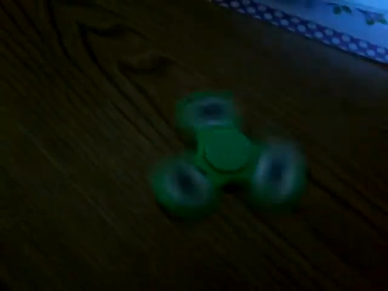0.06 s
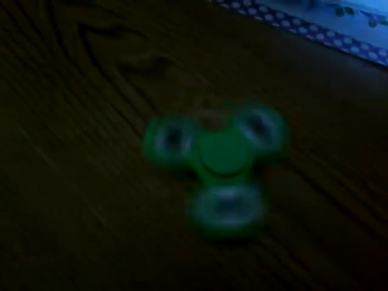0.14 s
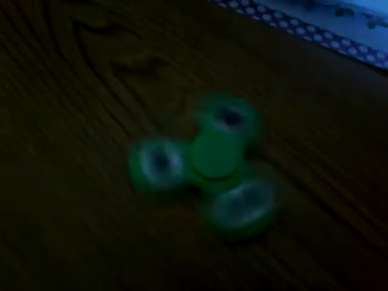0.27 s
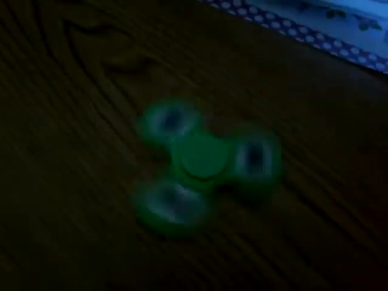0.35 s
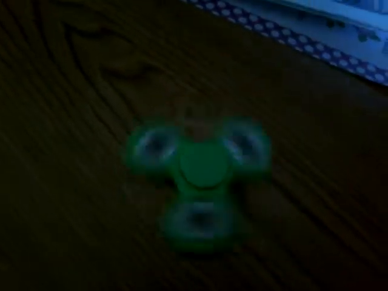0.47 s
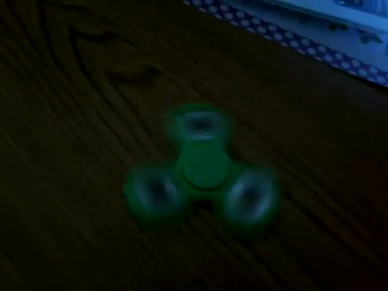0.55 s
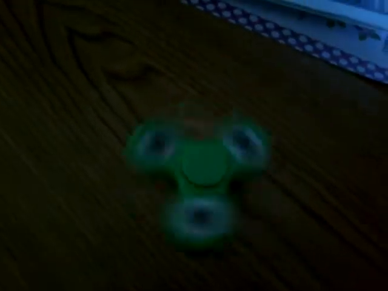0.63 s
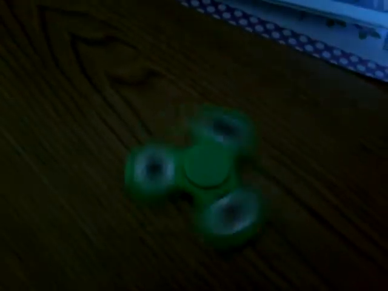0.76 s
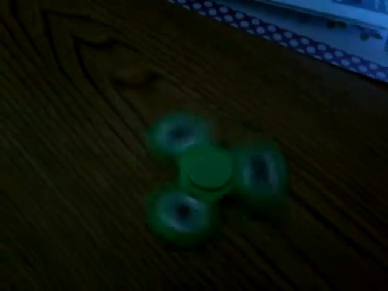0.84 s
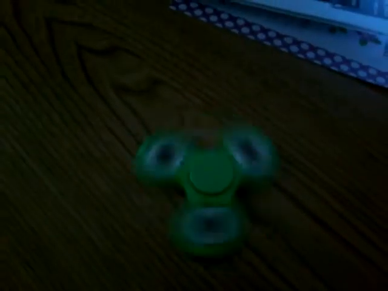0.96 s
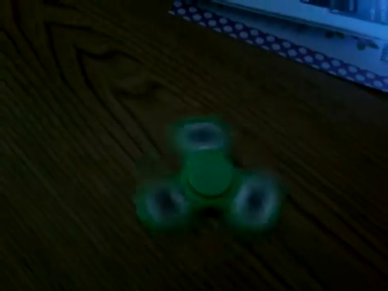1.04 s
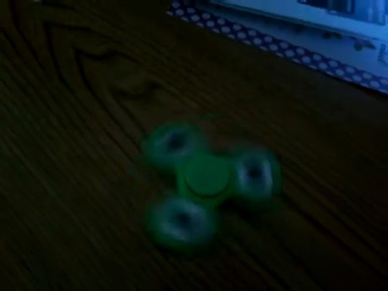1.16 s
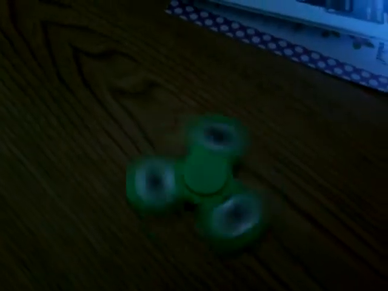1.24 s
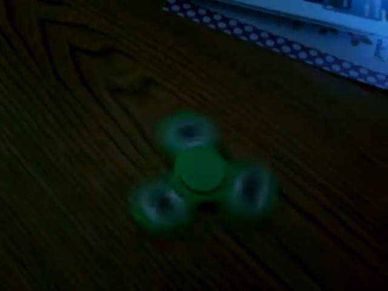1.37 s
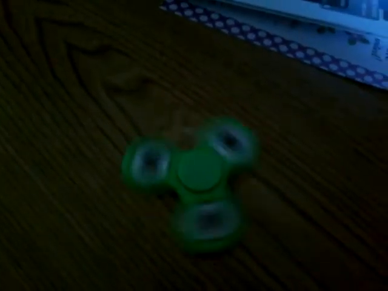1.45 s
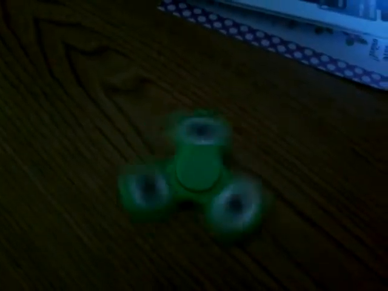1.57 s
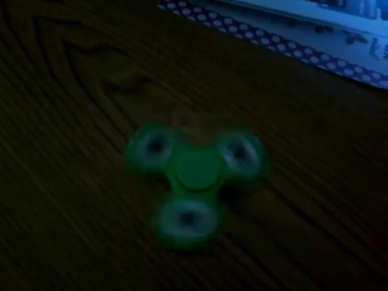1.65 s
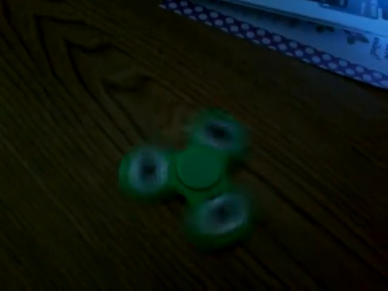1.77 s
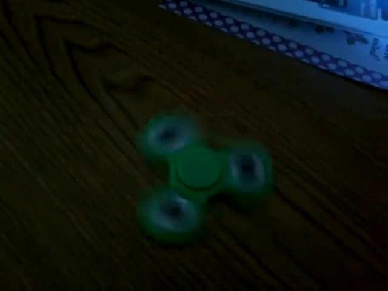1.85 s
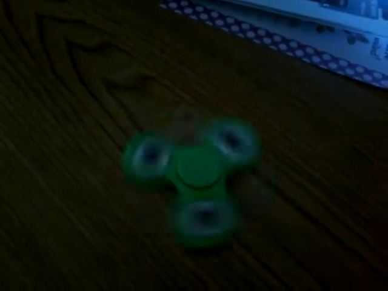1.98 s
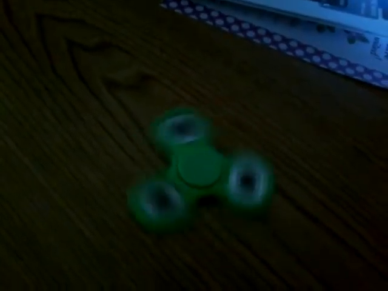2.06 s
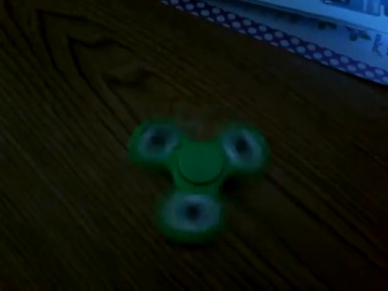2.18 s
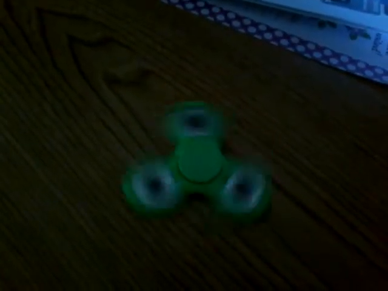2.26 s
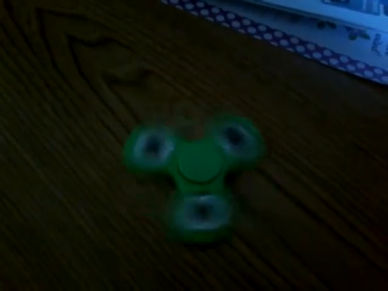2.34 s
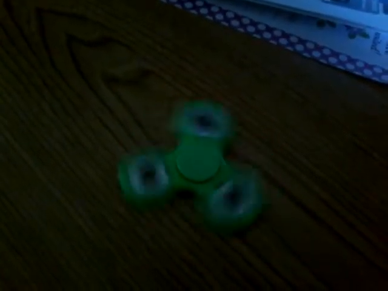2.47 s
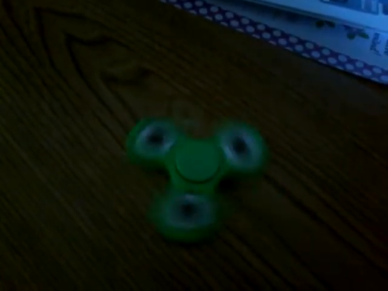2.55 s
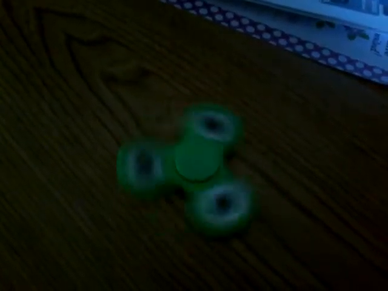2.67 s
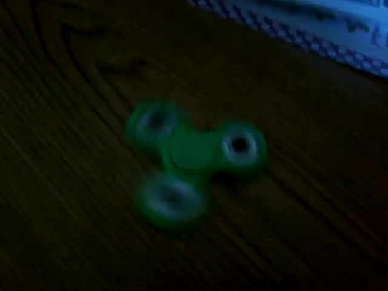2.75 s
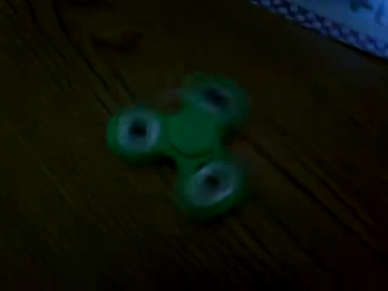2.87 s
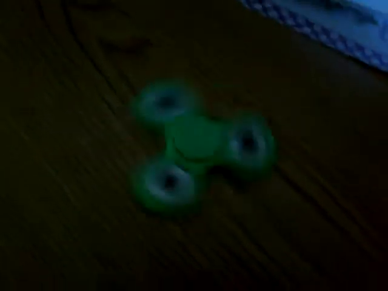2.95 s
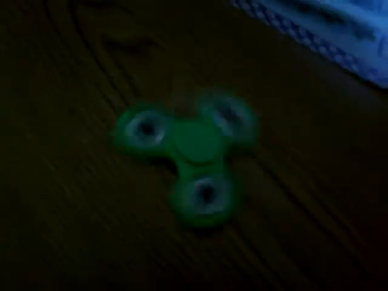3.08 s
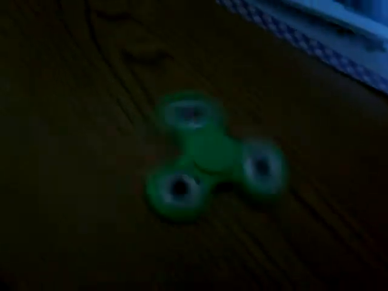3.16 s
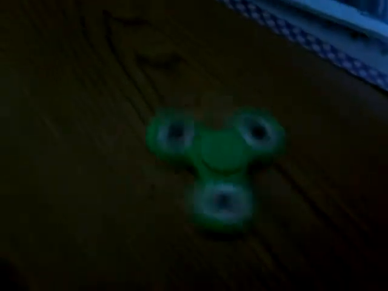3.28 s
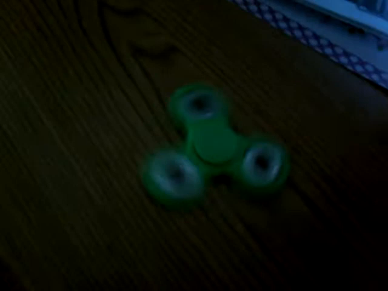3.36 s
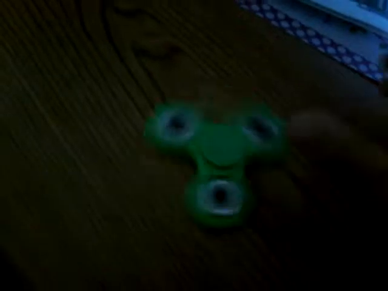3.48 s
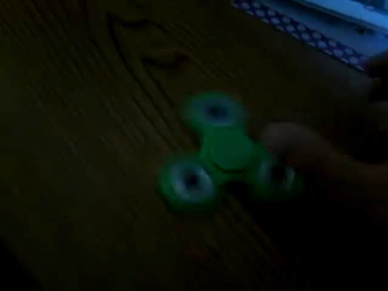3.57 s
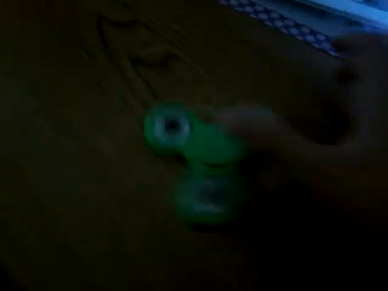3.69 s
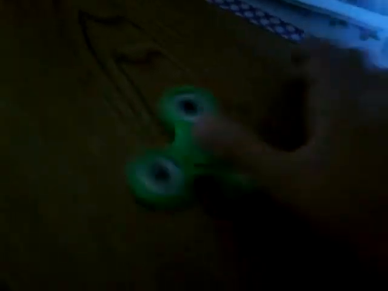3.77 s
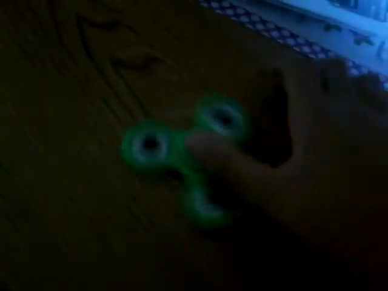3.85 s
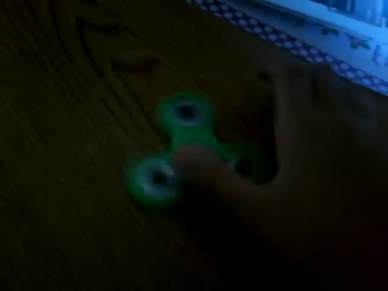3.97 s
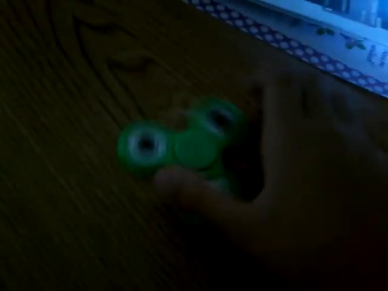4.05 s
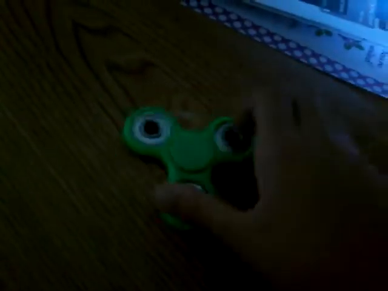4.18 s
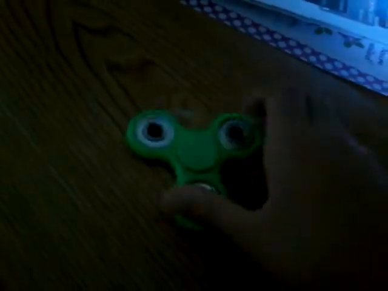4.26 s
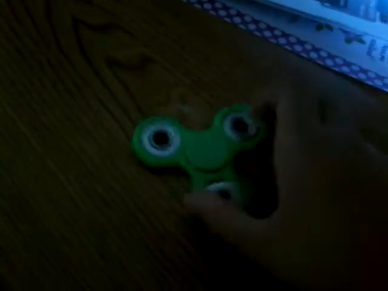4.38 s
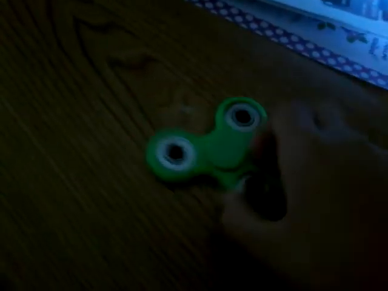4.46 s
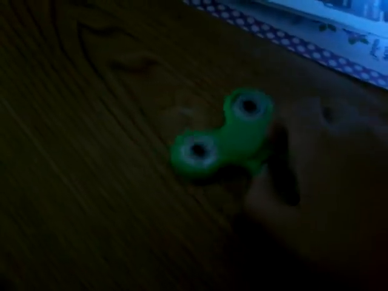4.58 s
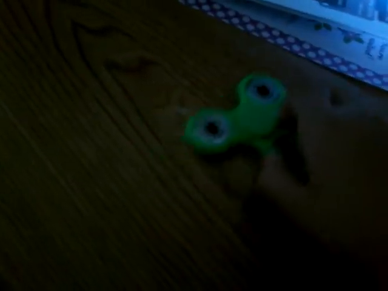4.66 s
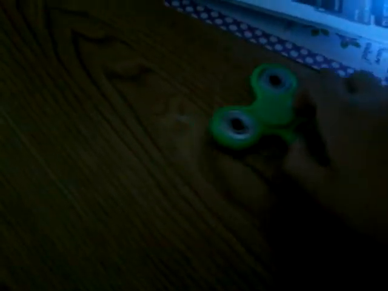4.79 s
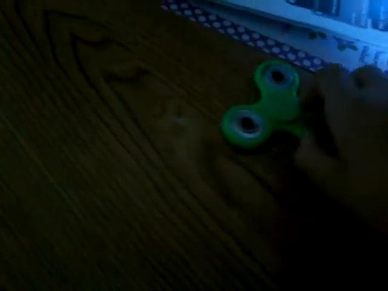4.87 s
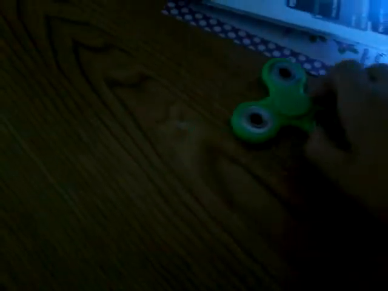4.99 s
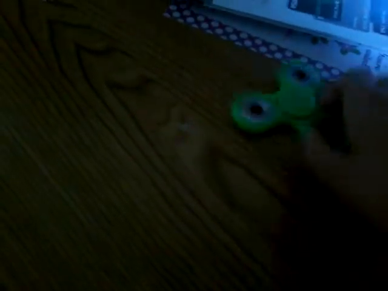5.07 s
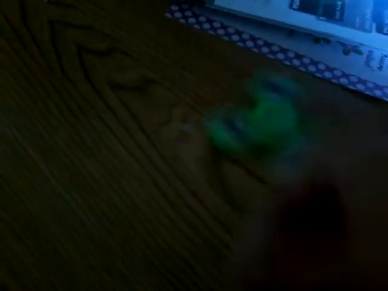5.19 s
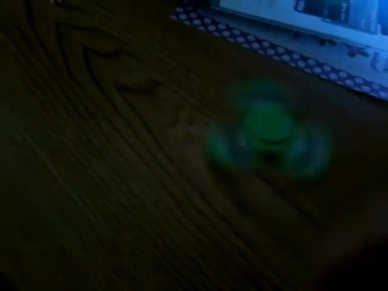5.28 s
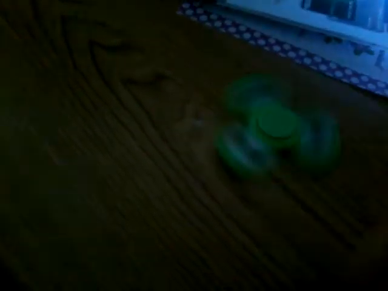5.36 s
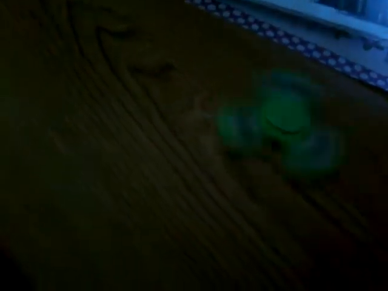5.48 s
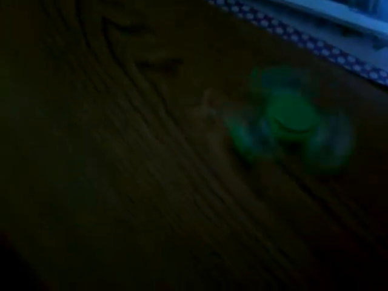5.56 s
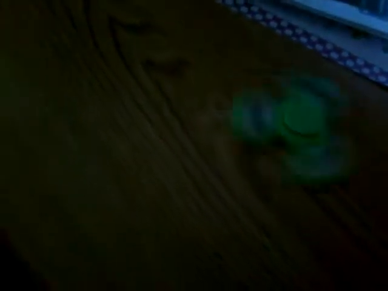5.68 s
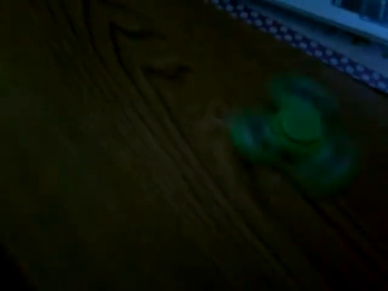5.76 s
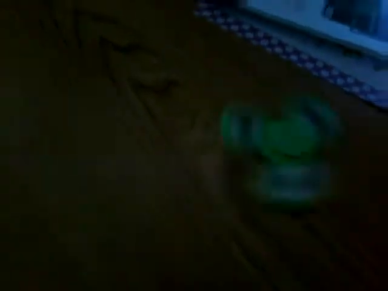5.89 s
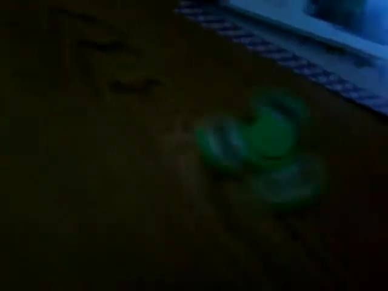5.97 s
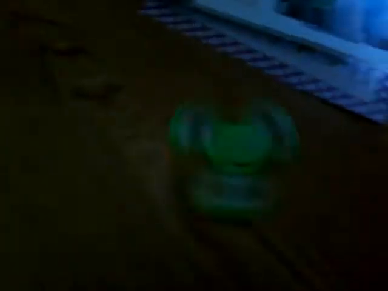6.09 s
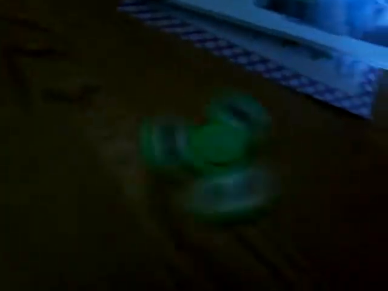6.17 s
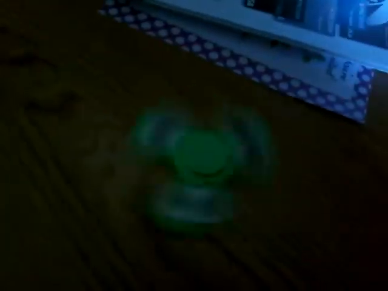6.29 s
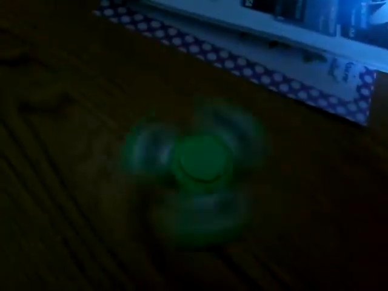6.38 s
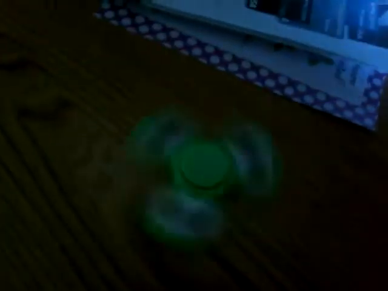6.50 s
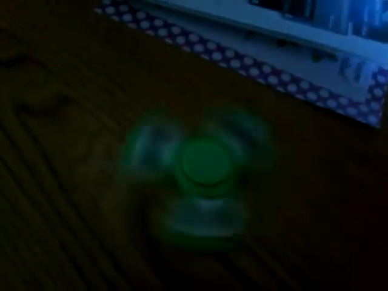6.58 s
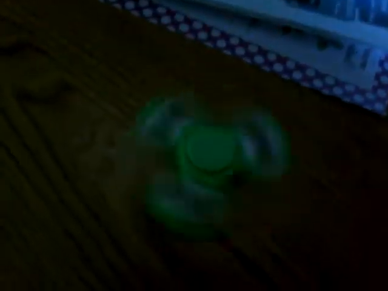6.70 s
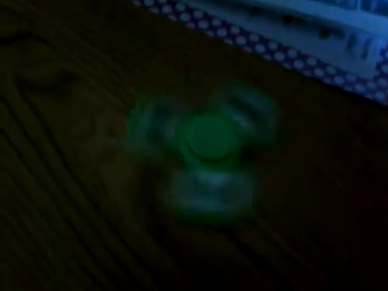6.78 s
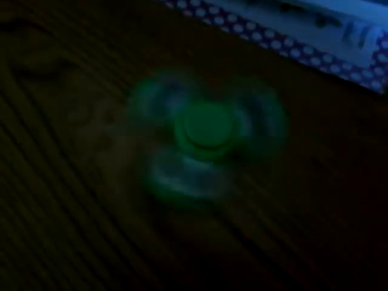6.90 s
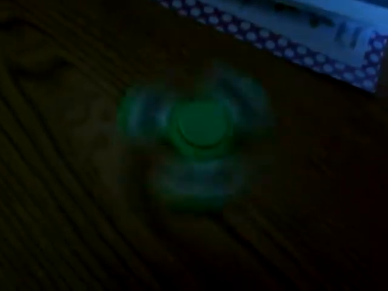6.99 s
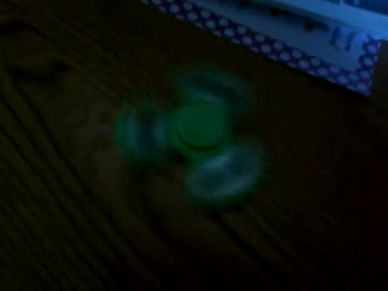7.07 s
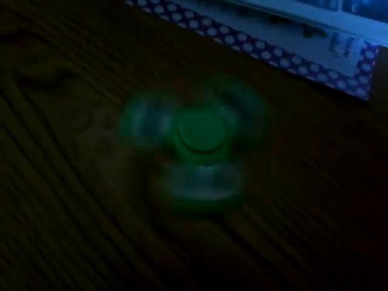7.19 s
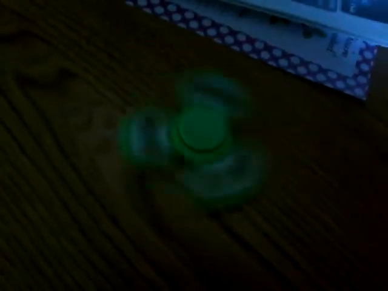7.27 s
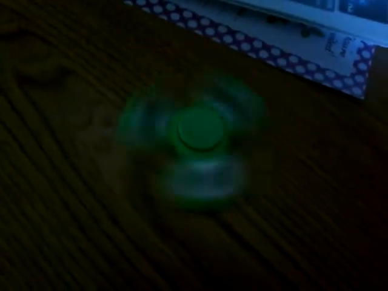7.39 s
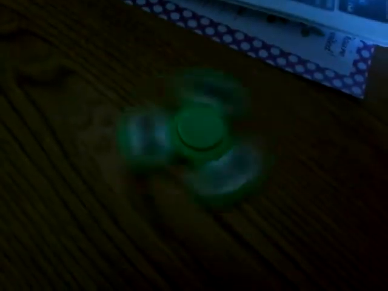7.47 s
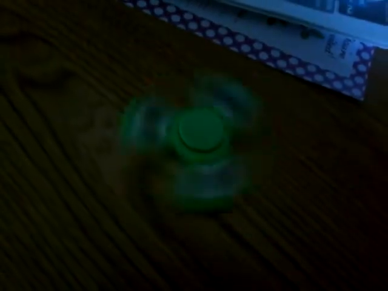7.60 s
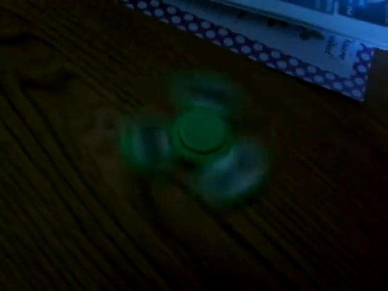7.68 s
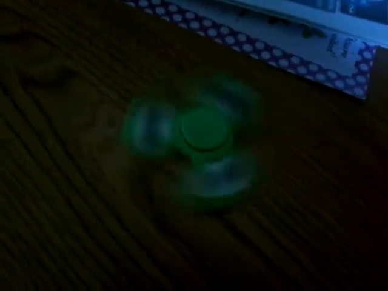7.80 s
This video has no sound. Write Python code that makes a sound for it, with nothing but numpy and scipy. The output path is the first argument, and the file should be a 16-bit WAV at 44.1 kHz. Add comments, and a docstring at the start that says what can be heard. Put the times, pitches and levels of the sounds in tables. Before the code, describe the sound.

Rumbling, ticking whir of a spinner on wood, one sharp snap, a brief scraping stop, then a brisker, rattlier spin over faint clock ticks.

```python
"""A whir slows, stops amid a snap and scrapes, then returns faster, with rattles, thumps and a faint clock.
A plastic fidget spinner on a wooden table is caught by a finger, pulled aside and flicked to a faster spin.
Random ball impacts ring the steel bearing near 7 kHz and rumble through tabletop modes; the loose rotor
rattles at set places in each turn. Skin and clock are coloured grains, the drag a slip train through wood;
a wavering low sine drone, hum and soft noise lie beneath."""
import sys
import numpy as np
from scipy import signal
from scipy.fft import rfft, irfft
from scipy.io import wavfile
from scipy.ndimage import uniform_filter1d, map_coordinates

SR = 44100
rng = np.random.default_rng(int(sys.argv[2]) if len(sys.argv) > 2 else 0)


def to_wav(sig):
    """Store sig (one row per channel, or 1-D mono) as 16-bit WAV at the path in sys.argv[1].

    Samples outside -1..1 are clipped; the rate is SR.
    """
    pcm = np.clip(np.atleast_2d(sig), -1, 1) * 32767
    pcm = np.round(pcm).astype(np.int16)
    wavfile.write(sys.argv[1], SR, pcm.T)  # frames by channels


N = 345699

# plastic rotor modes: f/Hz, width/Hz, relative level at slow spin/dB, at fast spin/dB
ROTOR_MODES = [(568, 150, 0.5, -2), (796, 150, 2.5, 0), (1007, 63, -2, 0), (1191, 116, -0.5, -2),
               (1640, 244, -6, -7), (1905, 144, -8, -1.5), (2140, 160, -5.5, -7.5), (2256, 140, -9, -8),
               (2490, 175, -2.5, -6), (3130, 1400, -10, -17)]
# steel bearing modes: f/Hz, width/Hz, relative level/dB
RACE_MODES = [(6330, 260, -12.5), (6885, 301, 5.5), (7650, 255, 0), (7900, 210, -2.5), (8670, 810, -10),
              (9140, 360, -7.5), (9870, 1600, -18.5)]


def undb(db):
    """Decibels to gain."""
    return 10 ** (np.asarray(db) / 20)


def unit(x):
    """Scale to rms 1."""
    return x / np.sqrt(np.mean(x ** 2))


def curves(table):
    """Columns of a table, interpolated linearly over time."""
    t_s, *columns = np.transpose(table)
    return [np.interp(np.arange(N) / SR, t_s, column) for column in columns]


def walk(rate_hz):
    """Smoothed random steps, spread near 1."""
    step = int(SR / rate_hz)
    held = np.repeat(rng.standard_normal(N // step + 1), step)
    return unit(uniform_filter1d(held, step)[:N])


def colour(points, size=4096):
    """Minimum-phase impulse response of a (f/Hz, level/dB) spectrum, via the folded cepstrum."""
    hz, db = np.transpose(points)
    f_hz = np.maximum(np.arange(size // 2 + 1) * SR / size, 1)
    gain = undb(np.interp(np.log(f_hz), np.log(hz), db))
    cepstrum = irfft(np.log(gain))
    causal = 2 * cepstrum[:size // 2] * (np.arange(size // 2) > 0)
    return irfft(np.exp(rfft(causal, size)))


def modes(table, size=12000):
    """Impulse response of damped resonances, decay set by width, polarity alternating."""
    t = np.arange(size) / SR
    response = np.zeros(size)
    for k, (hz, width_hz, db) in enumerate(table):
        decay = np.exp(-np.pi * width_hz * t)
        response += (-1) ** k * undb(db) * width_hz * decay * np.sin(2 * np.pi * hz * t)
    return response


def ring(force, response):
    """Drive a body with a force: convolution, cut to the force's length."""
    return signal.fftconvolve(force, response)[:len(force)]


def band(x, low_hz, high_hz):
    """Band-pass with moderately steep skirts."""
    return signal.sosfilt(signal.butter(2, [low_hz, high_hz], "bandpass", fs=SR, output="sos"), x)


def wander(x, depth, rate_hz):
    """Drift the pitch of a whole sound slightly by varying its read speed."""
    speed = 1 + depth * walk(rate_hz)
    return map_coordinates(x, [np.cumsum(speed / speed.mean())], order=3, mode="mirror")


def grains(rate_per_s, spread_db):
    """Tiny impacts of random time and sign; spread_db scales their exponential scatter in level."""
    hit = rng.random(N) < rate_per_s / SR
    scatter = np.minimum(rng.exponential(size=N), 3)
    return hit * rng.choice([-1, 1], N) * undb(spread_db * scatter)


def add(out, t_s, sound):
    """Mix a sound in at t_s, trimmed to the scene."""
    i = int(t_s * SR)
    part = sound[max(-i, 0):max(N - i, 0)]
    out[max(i, 0):max(i, 0) + len(part)] += part


def swells(table):
    """Half-sine level arches from rows of t/s, length/s, level/dB."""
    out = np.zeros(N)
    for t_s, length_s, db in table:
        add(out, t_s, undb(db) * np.sin(np.linspace(0, np.pi, int(length_s * SR))))
    return out


def chatter(decay_s, tail_db, tail_s, first=0, size=6000):
    """Force of one contact: optional first blow, quickly dying noise and a fainter, longer tail."""
    t = np.arange(size) / SR
    envelope = np.exp(-t / decay_s) + undb(tail_db) * np.exp(-t / tail_s)
    return first * (t == 0) + rng.standard_normal(size) * envelope


def blows(table, force, response):
    """Each t/s, peak/dB row drives a body with a fresh force."""
    out = np.zeros(N)
    for t_s, db in table:
        sound = ring(force(), response)
        add(out, t_s, sound * undb(db) / np.abs(sound).max())
    return out


def merged(hard, ordinary):
    """Hard blows, plus the ordinary ones that fall clear of them."""
    settle_s = .012
    clear = [(t_s, db) for t_s, db in ordinary
             if min(abs(t_s - row[0]) for row in hard) > settle_s]
    return list(hard) + clear


def room():
    """Steady electrical hum of sine partials over softly coloured noise."""
    # hum: f/Hz, rms/dB
    hum_lines = [(120, -81.5), (240, -64.5), (360, -73.5)]
    # hush colour: f/Hz, relative level/dB
    hush_points = [(20, -1.5), (60, -16), (100, 6), (170, -3), (240, -4.5), (500, -10), (1200, -16.5),
                   (3000, -20), (8000, -18.5), (15500, -23.5)]
    hush_rms_db = -65
    t = np.arange(N) / SR
    hum = sum(undb(db) * unit(np.sin(2 * np.pi * (hz * t + rng.random()))) for hz, db in hum_lines)
    hush = unit(ring(rng.standard_normal(N), colour(hush_points)))
    return hum + undb(hush_rms_db) * hush


def clock(step_s=0.037, room_s=0.047, size=16000):
    """Each second the gears shuffle briefly as coloured grains; an exponential fade stands for room smear."""
    # tick and tock in turn: rise/s, level/dB
    steps = [(.005, -53.5), (.03, -56.5)]
    # clock colour: f/Hz, relative level/dB
    gear_points = [(700, -70), (1600, -6), (2100, -7.5), (2250, 5), (2450, -9), (3600, -10.5), (5000, -7),
                   (6900, -1), (7800, -1.5), (9300, -14), (11000, -22)]
    first_tick_s = -0.033
    t = np.arange(size) / SR
    fade = np.exp(-np.maximum(t - step_s, 0) / room_s)
    level = np.zeros(N)
    for second in range(N // SR + 1):
        rise_s, db = steps[second % 2]
        add(level, first_tick_s + second, undb(db) * np.minimum(t / rise_s, 1) * fade)
    return level * unit(ring(grains(5000, spread_db=0.0), colour(gear_points)))


def drone():
    """Low sine of wavering pitch and level, with a slow throb and narrow noise about it."""
    # drone level before waver and throb: t/s, level/dB
    level_points = [(.15, -69), (1.1, -70.5), (4.4, -74.5), (4.8, -62.5), (5.12, -71), (5.3, -63),
                    (5.8, -58), (6.02, -68), (6.24, -54), (7.75, -52)]
    drone_hz, blur_db = 55.8, -75.5
    # the throb is plain while the drone is faint
    throb_db, throb_period_s, throb_crest_s = -78.5, .48, 1.47
    db, = curves(level_points)
    t = np.arange(N) / SR
    phase = 2 * np.pi * np.cumsum(drone_hz * (1 + 0.019 * walk(9))) / SR
    throb = undb(throb_db) * np.cos(2 * np.pi * (t - throb_crest_s) / throb_period_s)
    level = undb(db + 1.6 * walk(10)) + throb
    blur = walk(9) * np.sin(phase) + walk(9) * np.cos(phase)
    return unit(np.sin(phase)) * level + undb(blur_db) * blur


def fingers():
    """Skin catches and slips on plastic: dense uneven grains, sparse scratches, drifting colour."""
    # skin brushes the plastic: t/s, length/s, level/dB
    brushes = [(3.623, 0.14, -56.5), (4.115, 0.12, -58.5), (4.46, .14, -61), (4.6, 0.16, -54),
               (4.71, 0.16, -52), (5.13, 0.14, -55), (5.195, 0.1, -46.5)]
    # skin colour: f/Hz, relative level/dB
    skin_points = [(300, -30), (1400, -12.5), (1850, -6), (2400, -19), (3300, -13.5), (3700, -11),
                   (4200, -18.5), (5600, -8.5), (6800, 8), (7500, -4), (8400, -1), (9000, -4),
                   (10500, -10.5), (12000, -23), (15500, -29)]
    catches = undb(3 * walk(60))
    scratches = unit(grains(110, spread_db=-2.0))
    rub = unit(grains(2400, spread_db=0.0) * catches) + undb(-7) * scratches
    # the shifting grip bends the colour
    return swells(brushes) * unit(wander(ring(rub, colour(skin_points)), .015, 18))


def tabletop():
    """Impulse response of the wood: damped modes, each with its own polarity."""
    # tabletop modes: f/Hz, width/Hz, relative level/dB, polarity
    wood_modes = [(113.3, 50, -23.5, -1), (224.9, 34.4, -2, -1), (240, 23.6, 1.5, 1), (284, 31.6, -8, 1),
                  (302.8, 28, -7.5, -1), (359.5, 21.6, -9, -1), (396.8, 42.5, -9, 1), (451, 55, -10, -1),
                  (489.9, 54, -14, 1), (590, 22, -23, -1)]
    return sum(np.sign(polarity) * modes([mode]) for *mode, polarity in wood_modes)


def drag(wood):
    """The cap sticks and slips; each slip pushes the tabletop, which groans."""
    # cap dragged over wood: t/s, mean slip rate/Hz, level/dB
    drag_points = [(4.47, 270, -83), (4.5, 220, -54), (4.6, 200, -65), (4.655, 225, -41), (4.71, 260, -57),
                   (4.76, 225, -90)]
    slip_hz, db = curves(drag_points)
    slip_count = np.floor(np.cumsum(slip_hz * (1 + 0.0417 * walk(120))) / SR)
    slips = np.diff(slip_count, prepend=0)
    groan = ring(slips, np.convolve(wood, np.hanning(120)))
    # running rms divided out: resonance colours the groan, the table sets its level
    running_rms = np.sqrt(uniform_filter1d(groan ** 2, size=1500) + 1e-12)
    return groan / running_rms * undb(db)


def spin():
    """Free rotor under even friction: speed (turns/s), angle (rad) and freedom (0-1)."""
    # free spins: start/s, end/s, initial speed/(turns/s), loss/(turns/s per s)
    free_spins = [(-.097, 4.23, 9.453, .55), (5.192, 8, 15.597, .63)]
    spin_up_s, brake_s = 0.04, 0.039
    t = np.arange(N) / SR
    speed, turned, free = np.ones(N), np.zeros(N), np.zeros(N)
    for start_s, end_s, rate, loss in free_spins:
        on = (t >= start_s) & (t < end_s)
        age = t[on] - start_s
        speed[on] = rate - loss * age
        turned[on] = rate * age - loss * age ** 2 / 2
        free[on] = np.minimum(age / spin_up_s, 1) * np.minimum((end_s - t[on]) / brake_s, 1)
    return speed, 2 * np.pi * turned, free


def fastness(speed):
    """0 up to 9 turns/s (leaning rotor), 1 from 15 turns/s (shivering rotor)."""
    return np.clip((speed - 9) / 6, 0, 1)


def drops(speed, angle, free):
    """Rotor drops across its bearing play at set places in each turn: scattered t/s, peak/dB rows."""
    # drop places: share/turn, rattle peak slow/dB, fast/dB, thump peak slow/dB, fast/dB (before scatter)
    places = [(0, -43.5, -39.5, -46, -40), (.27, -53.5, -46.5, -56, -47), (.49, -53.5, -41, -53.5, -43.5),
              (.73, -57, -44.5, -59, -45)]
    jitter_s, rattle_scatter_db, thump_scatter_db = .0012, 1.9, 1.76
    rattles, thumps = [], []
    for share, rattle_slow, rattle_fast, thump_slow, thump_fast in places:
        at = np.flatnonzero(np.diff(np.floor(angle / (2 * np.pi) - share)) == 1)
        for i, (late, hard, heavy) in zip(at, rng.standard_normal((128, 3))):
            if free[i] > .5:
                t_s, fast = i / SR + jitter_s * late, fastness(speed[i])
                rattle_db = (1 - fast) * rattle_slow + fast * rattle_fast
                thump_db = (1 - fast) * thump_slow + fast * thump_fast
                rattles.append((t_s, rattle_db + rattle_scatter_db * hard))
                thumps.append((t_s, thump_db + thump_scatter_db * heavy))
    return rattles, thumps


def contacts(wood, turn_rattles, turn_thumps):
    """Rattles tick and ring bearing and body; rocking thumps the table; snaps and knocks stay dry."""
    # hardest bearing rattles: t/s, peak in the steel/dB
    hard_rattles = [(0.109, -39.5), (0.4402, -36), (.882, -40), (1.1106, -37), (1.334, -38), (1.4514, -33),
                    (1.5683, -36), (1.862, -37.5), (1.925, -38.5), (2.168, -40), (2.411, -34),
                    (3.4447, -39), (4.166, -38.5), (4.1805, -37), (4.454, -36), (4.5472, -36), (4.81, -35),
                    (5.272, -33.5), (5.8411, -30.5), (5.971, -31), (6.305, -32.5), (6.573, -32.5),
                    (6.868, -33.5), (7.1075, -32.5), (7.1452, -33.5), (7.5492, -35.5)]
    # cap rocks hard on the tabletop: t/s, peak/dB
    hard_rocks = [(.012, -35.5), (.441, -40.5), (.658, -36.5), (1.69, -40), (2.408, -40.5), (2.92, -38.5),
                  (3.05, -43), (4.182, -42.5), (4.462, -40), (4.836, -35.5), (5.253, -33), (5.712, -33.5),
                  (5.842, -28), (6.104, -32.5), (6.311, -33.5), (6.577, -31), (6.781, -30), (6.828, -33)]
    # dry plastic snaps: t/s, peak/dB
    snap_times = [(2.806, -39), (2.811, -39), (3.0002, -35), (3.0024, -29), (3.005, -16.5), (3.041, -35),
                  (3.064, -31.5), (3.114, -43.5), (3.135, -43), (4.183, -43), (4.455, -43)]
    # spinner knocked on the wood: t/s, peak/dB
    knock_times = [(.845, -44.5), (4.448, -34), (4.452, -36.5), (4.471, -43.5)]
    # snap colour: f/Hz, relative level/dB
    snap_points = [(200, -30), (700, -13), (2000, -11), (3500, -4), (5500, -5.5), (7500, -6), (10000, -39),
                   (15000, -41)]
    # wood knock modes: f/Hz, width/Hz, relative level/dB
    knock_modes = [(94, 33, -22), (234, 59, -23), (426, 114, -1), (716, 57, 0), (1108, 85, -1),
                   (2000, 420, -14.5), (2570, 510, -14), (3260, 420, -24), (5540, 3700, -25)]
    steel = band(modes(RACE_MODES, size=2000), 5300, 9700)
    plastic = modes(np.array(ROTOR_MODES)[:, :3], size=2000)
    snaps = blows(snap_times, lambda: chatter(0.00015, -15, 0.016, first=25), colour(snap_points))
    knocks = blows(knock_times, lambda: chatter(0.0016, -12.5, 0.022, first=9.1), modes(knock_modes))
    all_rattles = merged(hard_rattles, turn_rattles)
    rattles = blows(all_rattles, lambda: chatter(0.0022, -14, 0.016, first=3.8, size=3000), steel)
    ticks = blows(all_rattles, lambda: chatter(0.00081, -24, 0.008, size=2000), np.ones(1))
    body = blows(all_rattles, lambda: chatter(0.0016, -11, 0.0072, size=2000), plastic)
    # the cap lands softly, so mainly the low modes answer
    soft_wood = np.convolve(wood, np.hanning(90))[:6000]
    all_rocks = merged(hard_rocks, turn_thumps)
    rocks = blows(all_rocks, lambda: chatter(0.0022, -33, 0.036, first=37), soft_wood)
    return rattles + undb(-18) * ticks + undb(-19.5) * body + rocks + snaps + knocks


def bearing(force):
    """The races ring in a few close modes, whose pitch wanders as the balls move round."""
    races = band(ring(force, modes(RACE_MODES, size=2000)), 3600, 11000)
    return wander(races, .008, 7)


def rolling(wood, speed, angle, free):
    """Balls roll over rough races, louder with speed; their load swings with rotor angle."""
    # drift over the table, firmer or looser drive: t/s, rumble gain/dB
    footing_points = [(0, 1.5), (.65, 1), (1.05, -1), (1.7, -1), (2.25, 1), (3, -0.5), (4.2, -2),
                      (5.45, -3.5), (6.6, 0.5), (7.84, 0)]
    # hand shoves the spinner, which rolls a little: t/s, length/s, rumble level/dB, ring level/dB
    shove_rows = [(4.1, 0.19, -56, -64), (4.355, 0.039, -60, -69), (4.445, 0.29, -63.5, -57),
                  (4.551, 0.43, -50.5, -53), (5.106, 0.23, -47.5, -56)]
    # free-spin levels at 10 turns/s before footing, and growth per doubling of speed
    rumble_db, rumble_db_per_octave = -50, 10.5
    ring_db, ring_db_per_octave = -59, 15
    ring_footing_share = 0.57  # share of the footing gain, in dB, that the bearing gets
    fast, octaves = fastness(speed), np.log2(speed / 10)
    footing_db, = curves(footing_points)
    shoves = np.array(shove_rows)
    free_rumble = free * undb(rumble_db + rumble_db_per_octave * octaves + footing_db)
    free_ring = free * undb(ring_db + ring_db_per_octave * octaves + ring_footing_share * footing_db)
    rumble_level = np.hypot(free_rumble, swells(shoves[:, :3]))
    ring_level = np.hypot(free_ring, swells(shoves[:, [0, 1, 3]]))
    # slow: mostly a lean twice a turn; fast: mostly a shiver four times a turn
    lean = angle - .2
    load_db = free * ((2.4 - 1.8 * fast) * np.cos(2 * lean) + (0.74 + .5 * fast) * np.cos(4 * lean))
    # the balls chatter in clumps of a few milliseconds
    load_db = load_db + (3.4 - 1.3 * fast) * walk(230)
    impacts_per_s = 1500 + 200 * speed
    impacts = unit(grains(impacts_per_s, spread_db=2.5) * undb(load_db) / np.sqrt(impacts_per_s))
    hiss = undb(-15.0) * rng.standard_normal(N)
    whir = unit(bearing(impacts)) + hiss
    # the wood feels the same impacts plus the once-a-turn heave of the unbalanced rotor
    heave_db = free * (0.5 + .5 * fast) * np.cos(angle - .8)
    heave = unit(grains(2500, spread_db=2.0) * undb(heave_db))
    rumble = unit(ring(heave + 0.62 * impacts, wood))
    # the plastic rasps hollowly, its colour shifting with speed
    rotor = np.array(ROTOR_MODES)
    slow_body, fast_body = (unit(ring(heave + 0.75 * impacts, modes(rotor[:, [0, 1, column]])))
                            for column in (2, 3))
    rasp = (1 - fast) * undb(-14.0) * slow_body + fast * undb(-13.0) * fast_body
    return whir * ring_level + (rumble + rasp) * rumble_level


def scene():
    """Spinner, hand and clock in a quiet room, as one channel."""
    wood = tabletop()
    motion = spin()
    background = room() + clock() + drone()
    hand = fingers() + drag(wood)
    spinner = contacts(wood, *drops(*motion)) + rolling(wood, *motion)
    return (background + hand + spinner)[None]


def record(dry):
    """The phone cuts the top: steep elliptic low-pass."""
    top_hz = 15850
    return signal.sosfilt(signal.ellip(10, .2, 70, top_hz, fs=SR, output="sos"), dry)


dry = scene()
out = record(dry)
to_wav(out)
```